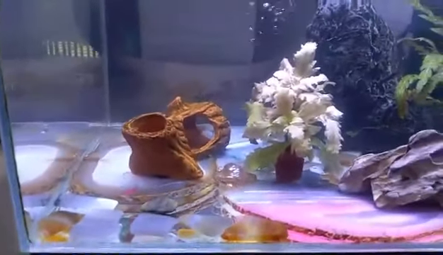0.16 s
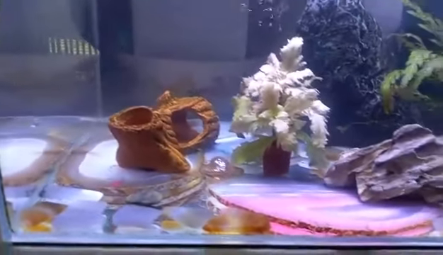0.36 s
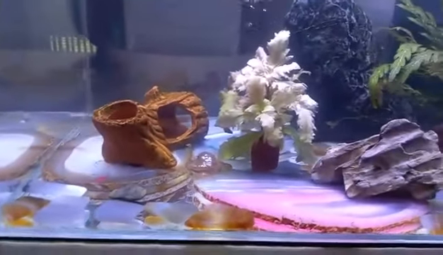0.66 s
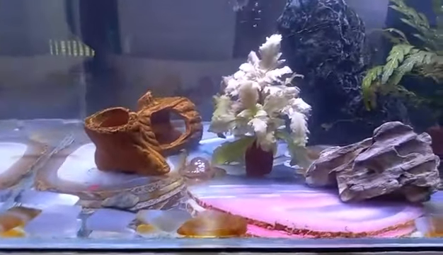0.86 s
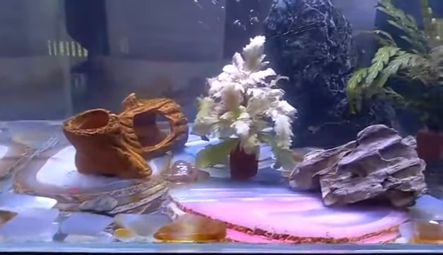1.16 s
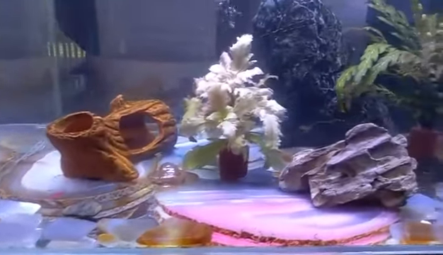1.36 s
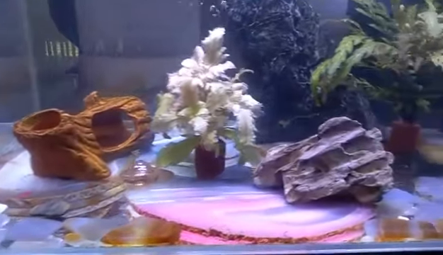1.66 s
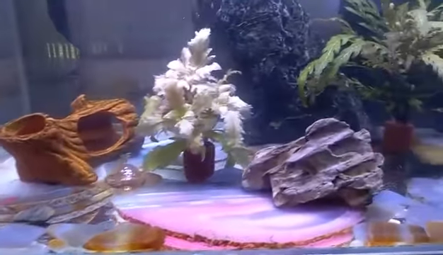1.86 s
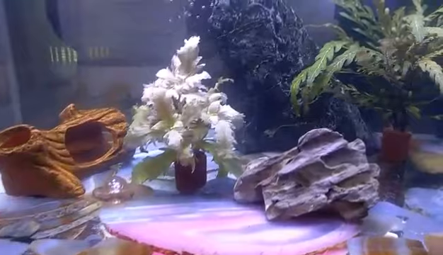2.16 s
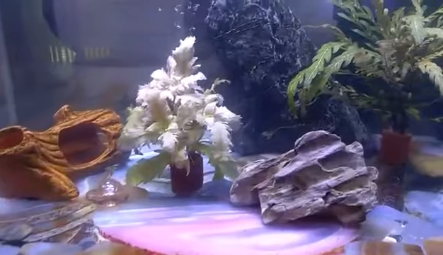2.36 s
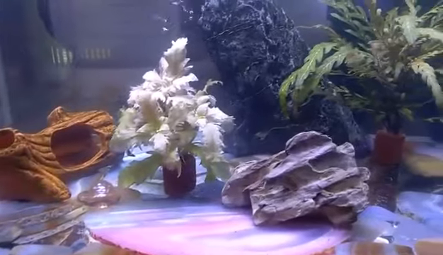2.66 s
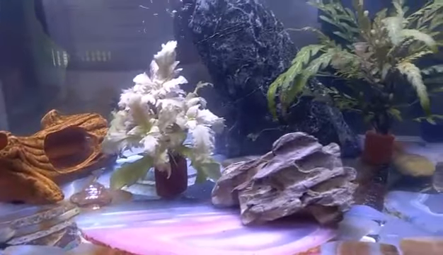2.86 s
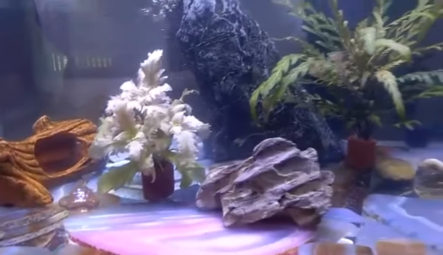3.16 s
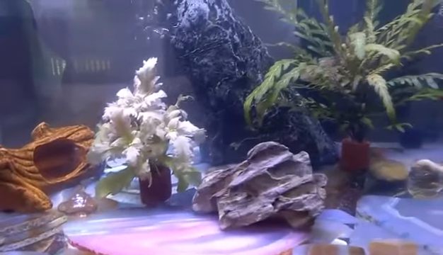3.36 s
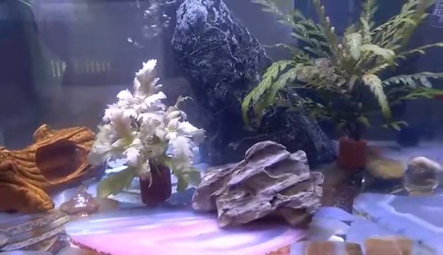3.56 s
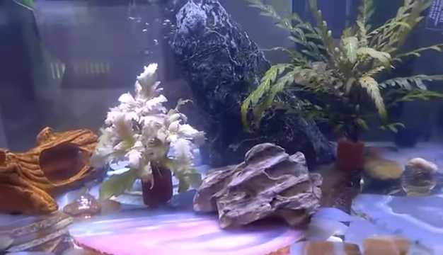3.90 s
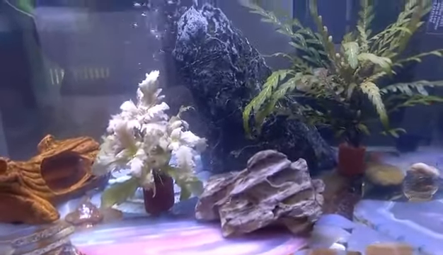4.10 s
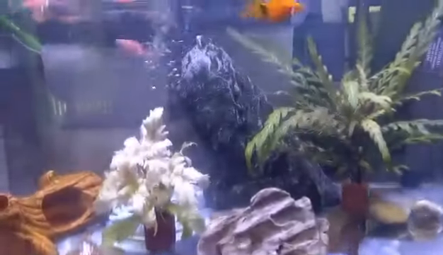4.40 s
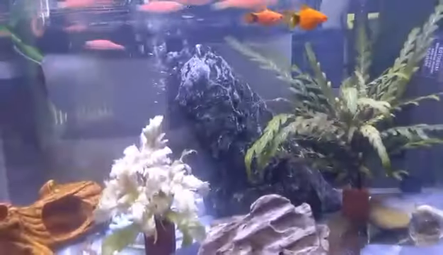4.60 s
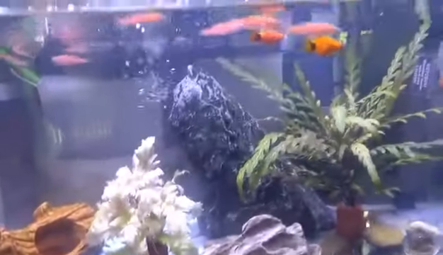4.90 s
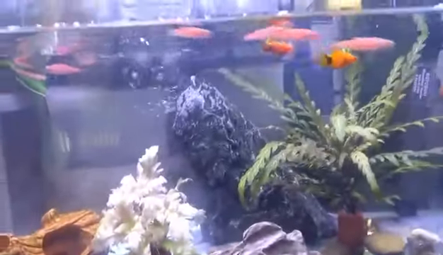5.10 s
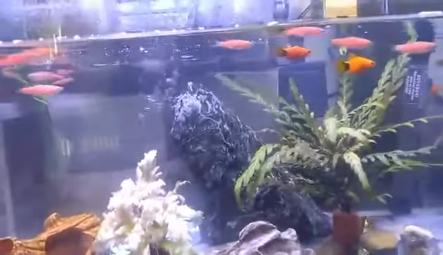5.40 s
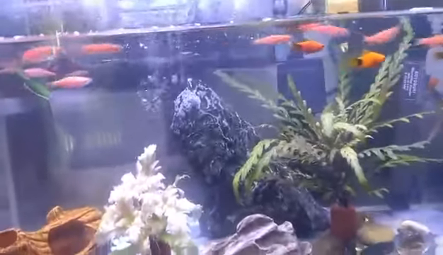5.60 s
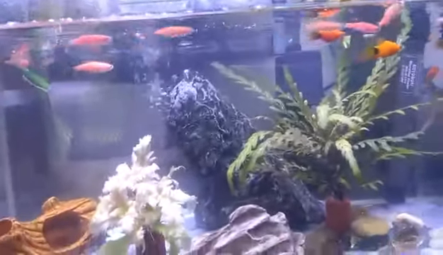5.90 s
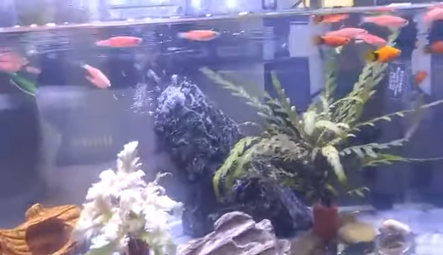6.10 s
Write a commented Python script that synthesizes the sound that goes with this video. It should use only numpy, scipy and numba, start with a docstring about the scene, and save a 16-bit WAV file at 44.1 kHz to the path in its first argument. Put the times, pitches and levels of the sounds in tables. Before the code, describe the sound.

Water bubbles and trickles in a home fish tank with a faint fizz, over low handling rumble and a few sharp knocks.

```python
"""At a home fish tank, close to the glass, on a hand-held phone with two microphone ports.
Air bubbles burst at the surface: pops and splashes over a gurgle, trickle and fizz; an air pump drones
faintly. Fingers cover the right port until about 2.7 s and the left from about 4.3 s. The covered
side loses the water and hears skin thump, rub and rumble. The phone cuts the bass, flattens the
loudest thumps and turns down quiet bands."""
import sys
import numpy as np
from scipy import signal
from scipy.io import wavfile
from scipy.ndimage import uniform_filter1d
from numba import njit

SR = 44100
rng = np.random.default_rng(int(sys.argv[2]) if len(sys.argv) > 2 else 0)


def generate_wav(signal):
    """Clip the signal to [-1, 1] and save it as 16-bit WAV at the path in sys.argv[1]."""
    frames = np.transpose(np.atleast_2d(signal))
    scaled = np.clip(frames, -1, 1) * 32767
    pcm = np.round(scaled).astype(np.int16)
    wavfile.write(sys.argv[1], SR, pcm)


N = 275625

# Crowds of large, middle and tiny bubbles: t/s, gurgle level/dB, trickle level/dB, fizz level/dB
CROWD_LEVELS = [(0, -50, -52.5, -53.5), (.25, -62.5, -58, -57), (.34, -66, -56.5, -55.5),
                (.4, -57, -51, -53), (.55, -59, -55, -53), (.76, -70.5, -58.5, -56), (.88, -58, -55, -56),
                (.97, -53, -58, -54.5), (1.02, -49, -56, -57.5), (1.2, -61, -62, -56),
                (1.3, -59, -61.5, -53), (1.45, -56, -54.5, -58), (1.58, -55.5, -56.5, -54),
                (1.76, -77, -65, -60), (1.95, -59, -58, -57.5), (2.4, -62.5, -56.5, -56),
                (2.65, -59.5, -54.5, -56.5), (2.74, -63, -57, -60.5), (2.83, -58.5, -57.5, -55),
                (3.04, -58.5, -57.5, -57.5), (3.12, -55, -55.5, -55.5), (3.25, -64, -59, -58),
                (3.4, -54.5, -55, -58.5), (3.5, -62.5, -55.5, -57.5), (3.58, -64, -57.5, -57.5),
                (3.7, -62, -61.5, -54.5), (3.83, -58.5, -55.5, -56.5), (3.93, -57, -62.5, -52.5),
                (4.0, -55, -56.5, -59), (4.12, -59, -56.5, -57.5), (4.4, -55.5, -56, -55),
                (4.6, -59, -56.5, -54.5), (4.95, -61, -59, -59), (5.2, -57, -56, -55.5),
                (5.4, -58.5, -62.5, -58), (5.65, -59.5, -55.5, -57), (5.9, -58.5, -56, -57),
                (6.05, -56, -54, -57.5), (6.25, -56.5, -61, -54.5)]
# Pitches that each crowd favours: f/Hz, width/Hz, level/dB
GURGLE_PITCHES = [(851, 91, -12), (1089, 133, -1), (1340, 36, -45), (1508, 137, -5)]
TRICKLE_PITCHES = [(2301, 450, 0), (2604, 472, -3.5), (2948, 98, -4), (3380, 680, -4.5)]
FIZZ_PITCHES = [(4153, 1085, 7.5), (5643, 694, 5), (6875, 1120, 9.5), (8940, 2200, -1), (11070, 1500, -7.5)]
# What gets past the finger at each port: t/s, gain/dB, low-pass f/Hz
LEFT_LEAK = [(0, 3.5, 13500), (2.299, 5, 13600), (2.75, 5, 13700), (4.3, 4.5, 15400), (4.5, -1.5, 9500),
             (4.68, -1, 5960), (4.8, 2, 1680), (5.25, -3.5, 1860), (5.35, 2, 1580), (6.25, 0.5, 1430)]
RIGHT_LEAK = [(0, -48, 1500), (2.05, -9, 1430), (2.16, -4, 1360), (2.4, 1, 2300), (2.649, 6, 4060),
              (2.759, 6, 18500), (6.25, 6, 17000)]
# Rumble of the restless grip: t/s, left level/dB, right level/dB
GRIP_LEVELS = [(0, -43, -39.5), (.25, -64, -39), (.65, -69, -45), (.9, -68, -53), (1.4, -61, -54),
               (2.0, -63.5, -50), (2.45, -72, -56), (2.65, -62, -60.5), (2.8, -66, -60.5),
               (4.12, -100, -61.5), (4.22, -44, -45.5), (4.45, -44.5, -47), (4.62, -46, -59),
               (4.8, -46, -63), (4.87, -39.5, -61), (5.0, -45.5, -53), (5.2, -44, -54), (5.5, -54, -75),
               (5.78, -44, -48), (6.25, -54, -61)]
# Pressure pulses of finger thumps, sometimes several per knock:
# t/s, level/dB, nominal length/ms, polarity +1 or -1, port 0 left 1 right
THUMP_PULSES = [(0.0058, -29.5, 0.89, -1, 1), (0.084, -37, 4.7, -1, 1), (0.182, -17, 1.6, 1, 1),
                (0.248, -41, 7.8, 1, 1), (0.2812, -38, 2.7, -1, 1), (0.301, -26, 6.4, 1, 1),
                (0.4498, -28.5, 0.97, 1, 1), (0.4621, -26, 1.45, -1, 1), (0.468, -25, 2.5, 1, 1),
                (0.5105, -27, 4.1, 1, 1), (0.548, -36, 1.9, -1, 1), (0.588, -29.5, 1.34, -1, 1),
                (0.592, -34, 5.5, 1, 1), (0.631, -27, 7.7, 1, 1), (0.77, -30.5, 4.3, 1, 1),
                (0.7977, -33.5, 2.5, 1, 1), (0.821, -32.5, 7.3, 1, 1), (0.9891, -28.5, 2.24, -1, 1),
                (1.199, -33, 3.05, 1, 1), (1.2218, -28.5, 8.3, -1, 1), (1.451, -33, 4.7, -1, 1),
                (1.508, -35, 5.1, -1, 1), (1.533, -32, 1.2, 1, 1), (1.541, -28.5, 6.1, -1, 1),
                (1.7012, -23.5, 4.5, 1, 1), (1.813, -30.5, 3.14, 1, 1), (1.863, -31, 7.6, -1, 1),
                (2.007, -37.5, 2.1, 1, 1), (2.024, -33.5, 1.33, -1, 1), (2.036, -34.5, 1.3, -1, 1),
                (2.05, -34.5, 2.2, -1, 1), (2.135, -36.5, 8.7, -1, 1), (2.165, -39, 4.8, 1, 1),
                (2.331, -23.5, 4.9, -1, 1), (2.489, -39, 1.35, -1, 1), (2.497, -46, 1.5, 1, 1),
                (2.604, -42.5, 1.9, 1, 0), (2.611, -37, 1.76, -1, 0), (4.1727, -11.5, 0.26, 1, 0),
                (4.294, -28, 4.3, 1, 0), (4.2995, -6, 0.83, 1, 0), (4.415, -5.5, 1.63, -1, 0),
                (4.512, -6.5, 1.13, -1, 0), (4.894, -18.5, 3.6, -1, 0), (4.9, -20, 2.4, 1, 0),
                (4.9027, -1, 1.45, -1, 0), (5.002, -24, 11.6, 1, 0), (5.039, -15, 8.7, 1, 0),
                (5.046, -3, 1.82, -1, 0), (5.654, -30, 5.9, -1, 0), (5.6819, -33, 2.4, -1, 0),
                (5.7022, -36, 2.4, -1, 0), (5.905, -35, 6.5, 1, 0), (5.9884, -37.5, 6.6, -1, 0),
                (6.011, -32, 6.1, -1, 0), (6.0972, -32.5, 5.2, 1, 0), (6.1412, -27, 9, 1, 0)]
# Splashes of fine droplets: t/s, level/dB, nominal f/Hz, length/s
DROPLET_SPLASHES = [(0.057, -29.5, 2930, 0.024), (0.15, -60, 2500, 0.043), (0.268, -34.5, 6700, 0.034),
                    (0.3571, -37, 6550, 0.046), (0.49, -58, 2960, 0.016), (0.649, -31, 6340, 0.027),
                    (0.919, -36, 3000, 0.0052), (0.954, -31, 8000, 0.018), (1.204, -41, 5660, 0.049),
                    (1.235, -33, 8900, 0.013), (1.282, -36, 3060, 0.037), (1.672, -31, 9500, 0.017),
                    (1.735, -30, 5000, 0.025), (1.862, -28, 2640, 0.029), (1.885, -35, 8000, 0.027),
                    (1.953, -33, 4500, 0.043), (2.088, -82, 2720, 0.02), (2.346, -48, 4470, 0.024),
                    (2.38, -54, 6000, 0.015), (2.73, -33, 4040, 0.05), (2.756, -27.5, 7600, 0.008),
                    (2.871, -47, 7240, 0.013), (2.934, -33.5, 7100, 0.026), (3.003, -44, 2800, 0.056),
                    (3.091, -29, 5970, 0.03), (3.134, -35, 2700, 0.015), (3.293, -38, 4420, 0.03),
                    (3.374, -42, 4230, 0.016), (3.387, -31.5, 4330, 0.034), (3.4575, -34, 7040, 0.019),
                    (3.6, -52, 7060, 0.03), (3.6531, -35, 2940, 0.028), (3.858, -64, 2720, 0.061),
                    (3.954, -25, 4500, 0.043), (4.0, -24, 7300, 0.056), (4.01, -62, 6010, 0.014),
                    (4.656, -57, 2510, 0.065), (4.796, -27, 6700, 0.03), (4.955, -29, 5700, 0.012),
                    (5.028, -25.5, 3000, 0.0098), (5.058, -26, 5550, 0.01), (5.23, -40, 6100, 0.014),
                    (5.34, -34, 6980, 0.045), (5.423, -58, 4290, 0.03), (5.557, -43, 7400, 0.038),
                    (5.663, -39, 6640, 0.0094), (5.763, -32, 6600, 0.063), (5.848, -43, 4370, 0.055),
                    (5.882, -80, 7000, 0.02), (6.15, -44.5, 6700, 0.026)]
# Clear single bursts: t/s, level/dB, f/Hz, time scale of the ring and its swarm/s
BUBBLE_POPS = [(0.071, -38, 3900, 0.025), (0.075, -43, 1290, 0.059), (0.073, -26.5, 2850, 0.035),
               (0.161, -29.5, 2370, 0.03), (0.196, -31, 1170, 0.023), (0.214, -36, 2950, 0.08),
               (0.368, -42.5, 2370, 0.14), (0.372, -33, 1270, 0.034), (0.395, -39, 1080, 0.044),
               (0.501, -38, 2880, 0.049), (0.72, -37, 860, 0.05), (0.817, -44, 2410, 0.12),
               (0.82, -32, 1190, 0.033), (0.843, -34, 1060, 0.029), (0.845, -33.5, 2170, 0.029),
               (0.903, -32, 2960, 0.052), (0.93, -42, 1300, 0.073), (1.004, -35.5, 2150, 0.022),
               (0.276, -36.5, 2790, 0.066), (1.194, -35, 5380, 0.044), (1.281, -32, 2940, 0.03),
               (1.281, -32, 2070, 0.034), (1.357, -33.5, 1210, 0.036), (1.46, -39, 2240, 0.045),
               (1.559, -36, 2480, 0.045), (1.562, -34.5, 990, 0.096), (1.565, -39.5, 1680, 0.06),
               (1.603, -36, 2030, 0.027), (1.741, -30, 2780, 0.029), (1.78, -34, 7140, 0.02),
               (1.848, -30, 1035, 0.036), (1.87, -35.5, 2150, 0.057), (1.961, -31.5, 2620, 0.026),
               (2.09, -36, 2350, 0.03), (2.14, -37.5, 1600, 0.037), (2.144, -33, 1140, 0.016),
               (2.202, -34.5, 1280, 0.058), (2.25, -32.5, 1066, 0.082), (2.331, -33.5, 4200, 0.029),
               (2.333, -28.5, 1100, 0.026), (2.364, -49.5, 4490, 0.48), (2.444, -42.5, 1400, 0.047),
               (2.581, -35.5, 1320, 0.062), (2.612, -41, 1110, 0.04), (2.663, -37, 990, 0.045),
               (2.687, -33.5, 3920, 0.012), (2.761, -64, 6560, 0.011), (2.78, -27.5, 2530, 0.024),
               (2.826, -30, 2680, 0.03), (2.869, -36.5, 7200, 0.03), (2.873, -37.5, 1330, 0.038),
               (2.943, -34, 1570, 0.078), (2.984, -43.5, 1100, 0.21), (2.987, -26, 2340, 0.034),
               (2.992, -38, 4380, 0.042), (3.068, -27.5, 2530, 0.079), (3.1, -38, 1160, 0.07),
               (3.17, -51, 1070, 0.055), (3.298, -37, 2550, 0.041), (3.397, -34.5, 973, 0.024),
               (3.41, -30, 4830, 0.019), (3.461, -41.5, 7000, 0.017), (3.603, -37.5, 7150, 0.025),
               (3.643, -28.5, 2370, 0.029), (3.653, -39, 2900, 0.049), (3.681, -32.5, 2730, 0.035),
               (3.752, -41.5, 1087, 0.08), (3.867, -28.5, 2580, 0.03), (3.909, -24, 2500, 0.039),
               (3.964, -30.5, 2300, 0.027), (3.971, -35, 5400, 0.023), (4.004, -37, 4700, 0.051),
               (4.119, -31, 2340, 0.032), (4.364, -40, 1284, 0.11), (4.55, -35, 2380, 0.048),
               (4.555, -29.5, 957, 0.05), (4.556, -41.5, 5830, 0.05), (4.625, -33, 2500, 0.061),
               (4.77, -43, 1090, 0.03), (4.822, -38, 2840, 0.054), (4.822, -28, 1200, 0.02),
               (4.873, -45.5, 2740, 0.11), (4.935, -35, 850, 0.056), (4.968, -39.5, 1300, 0.076),
               (4.971, -35, 2380, 0.045), (5.037, -39, 5600, 0.024), (5.127, -34, 2450, 0.04),
               (5.22, -32.5, 3040, 0.01), (5.223, -22, 5620, 0.028), (5.312, -33.5, 2880, 0.023),
               (5.412, -35, 3960, 0.011), (5.445, -38.5, 1500, 0.087), (5.452, -35.5, 3000, 0.07),
               (5.512, -33.5, 2350, 0.049), (5.564, -33.5, 6250, 0.01), (5.599, -35.5, 2640, 0.047),
               (5.753, -33, 1200, 0.021), (5.859, -28, 4500, 0.011), (5.936, -43, 2980, 0.04),
               (5.94, -39.5, 1075, 0.15), (6.066, -43, 2040, 0.065), (6.153, -37, 5540, 0.035),
               (6.202, -39, 2920, 0.081)]
# A finger slides off the right port: t/s, level/dB
SLIDE_LEVELS = [(0, -93), (2.46, -92), (2.5, -67.5), (2.6, -65), (2.7, -61), (2.76, -71), (3.1, -86),
                (6.25, -88)]
# Skin drags across the left port: t/s, length/s, level/dB, low-pass start f/Hz, end f/Hz
RUB_STROKES = [(4.171, 0.027, -31, 5770, 15000), (4.196, 0.06, -21.5, 6030, 3500),
               (4.295, 0.035, -19, 3800, 790)]

WAKE_DB, WAKE_FADE_S, CALM_GAIN = 25, 0.037, 0.67  # a burst's stir, its fading, the unstirred crowd
PORT_LAG_SAMPLES, PORT_SPREAD_S = 19, .00015
SCATTER_T60_S, ECHO_TAILS = .1, 6
PUMP_HZ, PUMP_DB = 100, (-73.5, -57.5)  # left, right
STIR_DB, STIR_SLOPE, STIR_FADE_S = -27, 0.72, 0.027  # rumble after a thump; slope in dB per dB of push
FAR_PORT_DB = -27.5  # handling noise that crosses to the other port
BASS_CUT_HZ, TOP_CUT_HZ, CEILING = 64.8, 13600, .49
HISS_DB, HISS_CORNER_HZ = -70.5, 1480


def undb(db):
    """Decibels to gain."""
    return 10 ** (np.asarray(db) / 20)


def curves(table):
    """Every column after the first, drawn over all samples."""
    s, *columns = np.transpose(table)
    return [np.interp(np.arange(N) / SR, s, c) for c in columns]


def unit(x):
    """Scale to rms 1."""
    return x / np.sqrt(np.mean(x ** 2))


def butter(x, order, hz, kind="low"):
    """Butterworth filter."""
    return signal.sosfilt(signal.butter(order, hz, kind, fs=SR, output="sos"), x)


def linger(kicks, fade_s):
    """Each kick dies away exponentially."""
    return signal.lfilter([1], [1, -np.exp(-1 / (fade_s * SR))], kicks)


def jolting_noise(spread_db, hold):
    """Noise whose level jumps every `hold` samples."""
    noise = rng.standard_normal(N)
    return noise * undb(spread_db * np.repeat(rng.standard_normal(N // hold + 1), hold)[:N])


@njit
def lowpass(x, hz, damping):
    """State-variable low-pass whose corner moves."""
    y, band, low = np.empty(len(x)), 0., 0.
    for i in range(len(x)):
        g = np.tan(np.pi * hz[i] / SR)
        v = (band + g * (x[i] - low)) / (1 + g * (g + damping))
        y[i] = low + g * v
        band, low = 2 * v - band, low + 2 * g * v
    return y


@njit
def rings(s, hz, t60, size, glide):
    """Bubbles: decaying sines whose pitch rises by the share `glide` over the ring."""
    out = np.zeros(N)
    for k in range(len(s)):
        start, length = int(s[k] * SR), int(t60[k] * SR)
        fade, phase, gain = np.exp(-np.log(1000.) / length), 0., size[k]
        rise = SR / hz[k] + length / 10  # swells over one cycle and a tenth of the ring
        for i in range(min(length, N - start)):
            phase += 2 * np.pi * hz[k] * (1 + glide * i / length) / SR
            out[start + i] += gain * np.sin(phase) * min(i / rise, 1.)
            gain *= fade
    return out


def crowd(pitches, gush_db, count, cycles, scatter_db, patchy_db):
    """Random bubbles ring near the favoured pitches, each size in its own spells; two ports, rms 1."""
    hz, width, db = np.transpose(pitches)
    when, pick, detune, big = rng.random((count, 4)).T
    k = (pick * len(hz)).astype(int)
    pitch = np.clip(hz[k] + width[k] * np.tan(2.745 * (detune - .5)) / 2, 500, 16000)
    spell_db = patchy_db * rng.standard_normal((len(hz), 64))[k, (when * 64).astype(int)]
    bunch_db = gush_db[(when * len(gush_db)).astype(int)]
    size = undb(db[k] + bunch_db + spell_db - scatter_db * np.log(1.02 - big))
    # bubbles lie all over the surface, so each reaches the two ports with its own lag
    lag = PORT_SPREAD_S * rng.random(count)
    return unit(np.array([rings(when * N / SR + late, pitch, cycles / pitch, size, glide=0.043)
                          for late in (lag, PORT_SPREAD_S - lag)]))


def wake(low_hz, high_hz):
    """Gain of a crowd: each pop or splash in its band stirs up bubbles of like size for a moment."""
    s, db, hz, _ = np.transpose(BUBBLE_POPS + DROPLET_SPLASHES)
    in_band = (hz >= low_hz) & (hz < high_hz)
    kicks = np.zeros(N)
    np.add.at(kicks, (s * SR).astype(int), np.minimum(undb(db + WAKE_DB), 1) * in_band)
    return CALM_GAIN + linger(kicks, WAKE_FADE_S)


def glass(x, wet_db=-0.5):
    """Glass and walls scatter the sound in short, shifting echoes."""
    t = np.arange(int(SCATTER_T60_S * SR)) / SR
    tail_index, out = np.linspace(0, ECHO_TAILS - 1, N), 0
    envelope = np.exp(-np.log(1000) * t / SCATTER_T60_S) * np.minimum(t / 0.00041, 1)
    for k in range(ECHO_TAILS):
        echo = rng.standard_normal(len(t)) * envelope
        echo *= undb(wet_db) / np.linalg.norm(echo)
        echo[0] = 1  # direct sound
        crossfade = np.sqrt(np.clip(1 - abs(tail_index - k), 0, 1))
        out = out + signal.fftconvolve(x * crossfade, echo / np.linalg.norm(echo))[:N]
    return out


def water():
    """All bubbles as they reach the two ports, opposite in sign and a little apart in time."""
    gurgle_db, trickle_db, fizz_db = curves(CROWD_LEVELS)
    bursts = pops() + splashes()
    gush_db = np.clip(2.5 * rng.standard_normal(N // 600), -8, 4)  # all sizes arrive in bunches
    gurgle = crowd(GURGLE_PITCHES, gush_db, count=5000, cycles=22., scatter_db=2.0, patchy_db=2.0)
    trickle = crowd(TRICKLE_PITCHES, gush_db, count=7000, cycles=28., scatter_db=2.0, patchy_db=1.5)
    fizz = crowd(FIZZ_PITCHES, gush_db, count=16000, cycles=24., scatter_db=2.8, patchy_db=1.6)
    bubbles = bursts + undb(gurgle_db) * wake(0, 1800) * gurgle
    bubbles += undb(trickle_db) * wake(1800, 3600) * trickle
    bubbles += undb(fizz_db) * wake(3600, 16000) * fizz
    left, right = butter(bubbles, 4, 800, "high")  # no bubble is large enough to sound in the bass
    return glass(np.roll(left, PORT_LAG_SAMPLES)), glass(-right)


def cover(x, leak):
    """Skin over the port dulls and weakens what comes through the air."""
    gain_db, hz = curves(leak)
    hz = np.clip(hz, 200, .45 * SR)
    return undb(gain_db) * lowpass(lowpass(x, hz, 1.27), hz, 1.27)


def pump():
    """The air pump drones at twice the mains frequency, wavering; opposite in sign at the two ports."""
    waver = unit(uniform_filter1d(uniform_filter1d(rng.standard_normal(N), 1500), 1500))
    drone = np.sin(2 * np.pi * PUMP_HZ * np.arange(N) / SR) * (1 + .22 * waver)
    return np.outer(undb(PUMP_DB) * [-1, 1], drone)


def rumble():
    """Low unsteady pressure from skin near each port, unrelated left and right; thumps swell it."""
    s, push_db, _, _, port = np.transpose(THUMP_PULSES)
    kicks = np.zeros((2, N))
    kicks[port.astype(int), (s * SR).astype(int)] = undb(STIR_SLOPE * push_db + STIR_DB)
    stir = linger(kicks, STIR_FADE_S)
    stir = stir + undb(FAR_PORT_DB) * stir[::-1]
    out = []
    for gain in np.hypot(undb(curves(GRIP_LEVELS)), stir):
        jolts = jolting_noise(spread_db=3.46, hold=1024)
        low, edge = unit(butter(jolts, 3, 130)), unit(butter(jolts, 4, 350))
        out.append(gain * low + gain ** 3.1 * undb(-19.0) * edge)
    return np.array(out)


def thumps():
    """Trapped air pushes the diaphragm, which swings on; skin cracks on hard pushes and settles after."""
    push, crack, settle = np.zeros((3, 2, N + SR))
    t = np.arange(SR // 5) / SR
    crack_shape = np.exp(-t / 0.0034) * np.minimum(t / 0.00099, 1)
    for s, db, ms, polarity, port in THUMP_PULSES:
        n, port = int(1.74 * ms * SR / 1000), int(port)
        start = max(int(s * SR) - n // 2, 0)
        push[port, start:start + n] += undb(db) * polarity * np.hanning(n)
        crack[port, start:start + len(t)] += undb(2.18 * db - 7.1 * ms + 7.5) * crack_shape
        settle[port, start:start + len(t)] += undb(db - 7.7 * ms - 35.0) * np.exp(-t / 0.18)
    swing = butter(push, 1, [85, 165], "band")
    crack = butter(crack * rng.standard_normal(crack.shape), 2, [600, 4500], "band")[:, :N]
    settle = butter(settle * rng.standard_normal(settle.shape), 3, [200, 700], "band")
    out = (push + 0.92 * swing + settle)[:, :N]
    # most of the crack comes through the skin that covers the port
    for port, leak in enumerate((LEFT_LEAK, RIGHT_LEAK)):
        skin_hz = np.clip(1.11 * curves(leak)[1], 200, .45 * SR)
        out[port] += 0.056 * crack[port] + lowpass(crack[port], skin_hz, 2.6)
    return out


def splashes(count=40, cycles=5.8):
    """Each splash is a quick volley of briefly ringing droplets, wide in pitch, thinning out."""
    s, db, hz, length = np.transpose(DROPLET_SPLASHES)[:, :, None]
    late, wide = np.moveaxis(rng.random((len(s), count, 2)), 2, 0)
    drop_hz = np.clip(hz * 2.5 ** (wide - .35), 900, 13000).ravel()
    when = s + length * late ** 2.4
    size = undb(db - 3 - 23.5 * late)
    return rings(when.ravel(), drop_hz, cycles / drop_hz, size.ravel(), glide=0.054)


def pops(count=20):
    """Each burst is one bubble, a swarm of short neighbours of near pitch, and a spray of droplets."""
    s, db, hz, span = np.transpose(BUBBLE_POPS)
    bubble = rings(s, hz, .3 * span, undb(db), glide=.05)
    late, detune, wide = rng.random((3, len(s), count))
    fading_db = (db[:, None] - 16 * late).ravel()
    swarm_s = (s[:, None] + 0.43 * late * span[:, None]).ravel()
    swarm_hz = (hz[:, None] * (1 + 0.33 * (detune - .5))).ravel()
    swarm = rings(swarm_s, swarm_hz, 17.5 / swarm_hz, undb(fading_db - 12.0), glide=0.19)
    spray_s = (s[:, None] + 0.015 * late ** 2).ravel()
    spray_hz = np.clip(hz[:, None] * 10.0 ** (wide - .35), 800, 12000).ravel()
    spray = rings(spray_s, spray_hz, 13.6 / spray_hz, undb(fading_db - 19.0), glide=0.058)
    return bubble + swarm + spray


def slide():
    """Skin slides off the right port with a soft low rustle."""
    rustle = unit(butter(jolting_noise(spread_db=3.4, hold=256), 2, [250, 750], "band"))
    return np.outer([undb(FAR_PORT_DB), 1], undb(curves(SLIDE_LEVELS)[0]) * rustle)


def rub(attack_share=0.27, release_share=0.26, sag_db=-7.5):
    """Skin sticks and slips on the left port: uneven clicks that weaken as the finger slows."""
    t, out = np.arange(N) / SR, 0
    slips = unit(rng.standard_normal(N) * undb(-2.5 * np.log(1 - rng.random(N))))
    for s, length, db, start_hz, end_hz in RUB_STROKES:
        along = np.clip((t - s) / length, 0, 1)
        hz = start_hz * (end_hz / start_hz) ** along
        shape = np.clip(np.minimum(along / attack_share, (1 - along) / release_share), 0, 1)
        friction = lowpass(slips, hz, 1.85) * np.sqrt(SR / 3 / hz)
        out = out + friction * shape * undb(db + sag_db * along)
    return out


def suppress(x, margin_db, floor_db, release):
    """Noise suppressor: bands near their usual level are turned down; they open at once, close slowly."""
    hz, _, spectrum = signal.stft(x, SR, nperseg=512)
    power = uniform_filter1d(abs(spectrum) ** 2, size=4, axis=1)
    power = uniform_filter1d(power, size=3, axis=2)
    quiet = np.median(power.max(axis=0), axis=1) * undb(2 * margin_db) * (hz > 220)
    gain = np.clip(1 - quiet[:, None] / (power + 1e-18), undb(floor_db), 1)
    for k in range(1, gain.shape[2]):
        gain[..., k] = np.maximum(gain[..., k], release * gain[..., k - 1])
    return signal.istft(spectrum * gain, SR, nperseg=512)[1][:, :N]


def scene():
    """At the microphones: water through the covered or open ports, handling noise and the pump."""
    left, right = water()
    ports = np.array([cover(left, LEFT_LEAK) + rub(), cover(right, RIGHT_LEAK)])
    return ports + thumps() + rumble() + slide() + pump()


def record(dry):
    """The phone: a bass cut that makes thumps ring, soft clipping, suppressor, faint hiss, top cut."""
    x = butter(dry, 3, BASS_CUT_HZ, "high")
    x = x / (1 + (x / CEILING) ** 6) ** (1 / 6)
    x = suppress(x, margin_db=0.35, floor_db=-15.0, release=0.98)
    hiss = undb(HISS_DB) * butter(rng.standard_normal(dry.shape), 1, HISS_CORNER_HZ)
    return signal.sosfilt(signal.ellip(10, .2, 70, TOP_CUT_HZ, fs=SR, output="sos"), x + hiss)


dry = scene()
out = record(dry)
generate_wav(out)
```